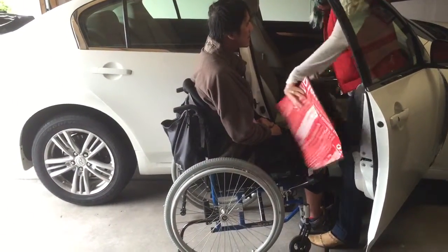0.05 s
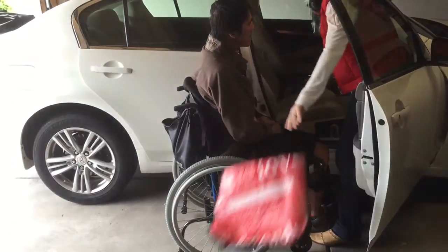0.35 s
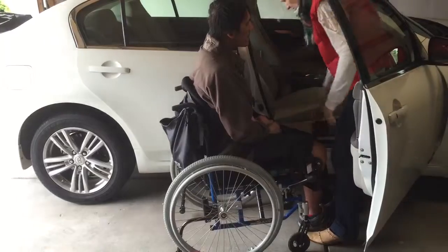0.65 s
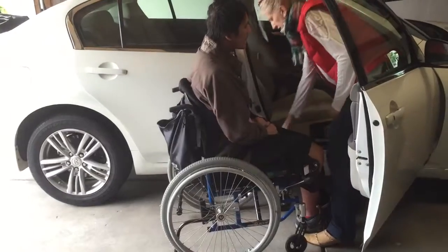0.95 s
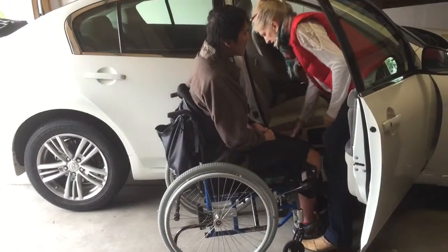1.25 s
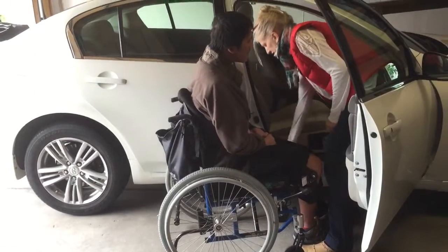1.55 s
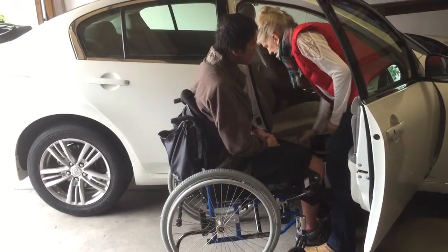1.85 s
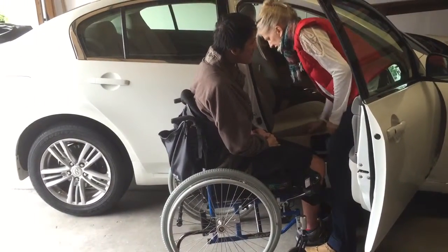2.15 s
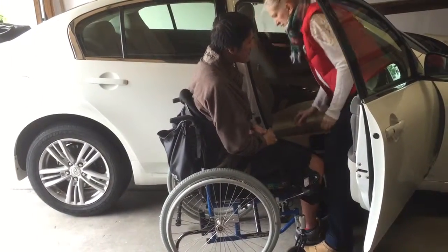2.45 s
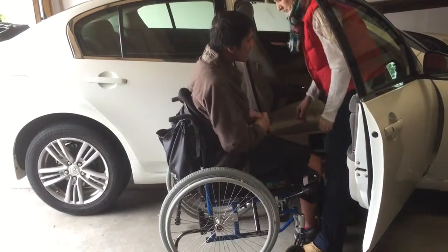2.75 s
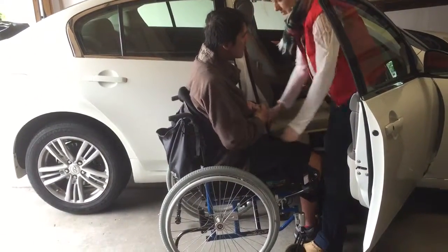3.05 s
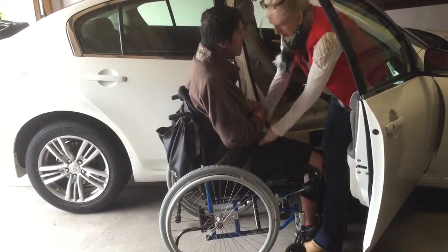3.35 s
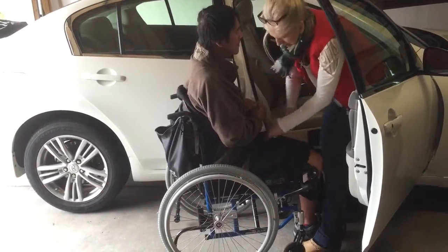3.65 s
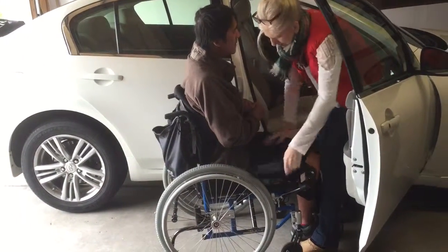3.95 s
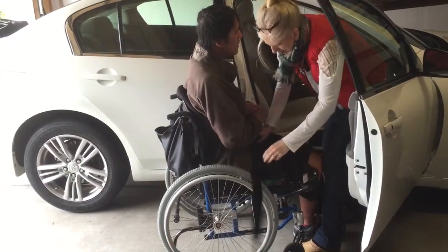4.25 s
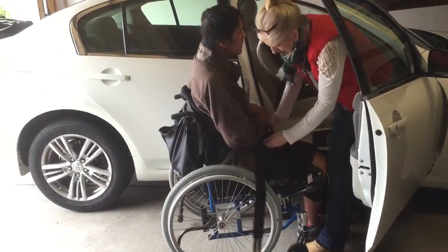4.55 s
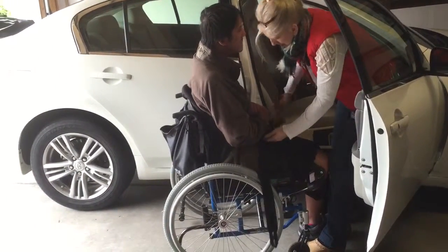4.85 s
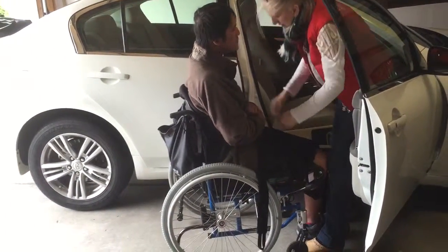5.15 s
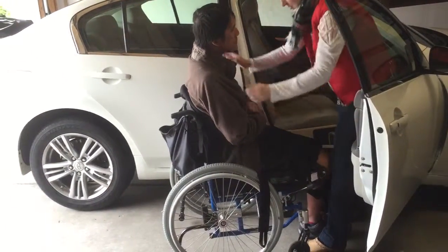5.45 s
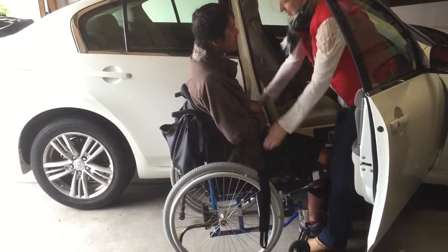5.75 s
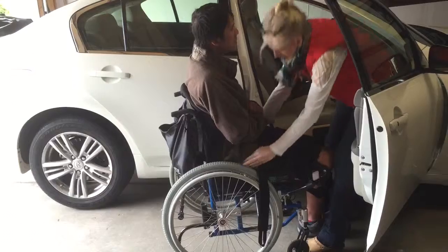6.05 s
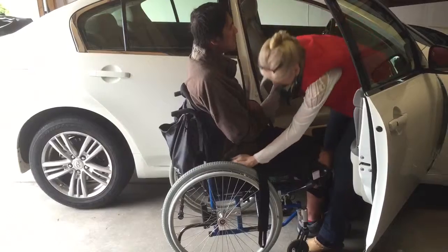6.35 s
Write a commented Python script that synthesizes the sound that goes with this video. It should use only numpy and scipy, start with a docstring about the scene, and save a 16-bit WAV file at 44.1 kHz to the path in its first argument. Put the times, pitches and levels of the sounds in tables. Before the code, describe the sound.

A thin plastic bag slaps and crumples a few times. A hollow car panel is knocked and rings briefly, then a metal catch snaps with a sharp ping, followed by light clacks and clicks from wheelchair fittings. A webbing strap swishes over an edge and creeps on in faint, stuttering zips while sleeves brush a jacket. It is heard from a few metres away in a quiet concrete garage with a short echo.

```python
"""Readying a wheelchair in a garage.

A helper works beside an open car, a few metres away. A tossed plastic bag slaps and crumples, a hollow
panel is knocked and rings, a metal catch pings and fittings click. Then a webbing strap swishes over
an edge and creeps on by stick and slip, and sleeves brush a jacket. Concrete and the car reflect it all."""
import sys
import numpy as np
from scipy import signal
from scipy.fft import rfft, irfft
from scipy.io import wavfile

SR = 44100
rng = np.random.default_rng(int(sys.argv[2]) if len(sys.argv) > 2 else 0)


def output_pcm(signal):
    """Save a mono or channel-first signal as 16-bit PCM at the path in sys.argv[1].

    Samples are clipped to [-1, 1] before scaling.
    """
    pcm = np.clip(np.atleast_2d(signal).T, -1, 1) * 32767
    wavfile.write(sys.argv[1], SR, np.round(pcm).astype(np.int16))


N = 286768
T = np.arange(N) / SR

# Spectrum of the hard fittings. Each row: frequency in Hz, level in dB.
FITTING_SPECTRUM = [(60, -32.5), (250, -14.5), (480, -5.5), (680, -0.5), (1000, 0), (1800, -1), (2500, -3),
                    (3800, -7.5), (6500, -11.5), (8500, -25), (15000, -30)]


def undb(db):
    """Decibels to gain."""
    return 10 ** (np.asarray(db) / 20)


def unit(x):
    """Scale to rms 1."""
    return x / np.sqrt(np.mean(x ** 2))


def fade(t, t60_s):
    """Exponential decay, 60 dB down at t60_s."""
    return np.exp(-np.log(1000) * t / t60_s)


def along(hz, points):
    """Interpolate (Hz, value) points on a log-frequency axis."""
    knots_hz, values = np.transpose(points)
    return np.interp(np.log(np.maximum(hz, 1)), np.log(knots_hz), values)


def add(out, start_s, x):
    """Mix x into out from start_s."""
    i = max(int(start_s * SR), 0)
    out[i:i + len(x)] += x[:N - i]


def butter(order, hz, kind="low"):
    """Butterworth filter sections."""
    return signal.butter(order, hz, kind, fs=SR, output="sos")


def colour(x, spectrum, bass_db=0, treble_db=0, bass_hz=520, treble_hz=3000, size=4096):
    """Minimum-phase filter of unit energy: a spectrum plus bass and treble shelves."""
    hz = np.arange(size // 2 + 1) * SR / size
    db = along(hz, spectrum) + bass_db / (1 + (hz / bass_hz) ** 4)
    db += treble_db * (1 - 1 / (1 + (hz / treble_hz) ** 4))
    cepstrum = irfft(np.log(undb(db)))
    cepstrum[1:size // 2] *= 2
    cepstrum[size // 2 + 1:] = 0
    impulse = irfft(np.exp(rfft(cepstrum)))
    return signal.fftconvolve(x, impulse / np.linalg.norm(impulse))[:len(x)]


def resonate(x, resonances):
    """Parallel resonances, each at least 20 Hz wide; rms 1."""
    return unit(sum(undb(db) * signal.lfilter(*signal.iirpeak(hz, hz / max(width_hz, 20), SR), x)
                    for hz, width_hz, db in resonances))


def walk(rate_hz):
    """Smooth random wander, spread near 1."""
    knots = rng.standard_normal(8192)
    return np.interp(T * rate_hz, np.arange(len(knots)), knots)


def grain(spread_db):
    """Friction noise: dense tiny slips of uneven size; rms 1."""
    noise = rng.standard_normal(N)
    sizes_db = spread_db * np.repeat(rng.standard_normal(N), 8)[:N]
    return unit(noise * undb(sizes_db))


def swell(start_s, rise_s):
    """Speed of one slip: peaks at 1 after rise_s, then dies away."""
    age = np.maximum(T - start_s, 0) / rise_s
    return age ** 2 * np.exp(2 * (1 - np.minimum(age, 20)))


def ring(start_s, modes, peak_db, contact_s=0.0013):
    """Decaying modes, built up over the contact."""
    t, out = T[:SR], np.zeros(N)
    tone = sum((-1) ** k * undb(db) * np.sin(2 * np.pi * hz * t) * fade(t, t60_s)
               for k, (hz, db, t60_s) in enumerate(modes))
    tone *= 1 - np.exp(-t / contact_s)
    add(out, start_s, undb(peak_db) * tone / np.abs(tone).max())
    return out


def blows(hits, spectrum, push, rise_s=0.0002):
    """Impacts: one push within a decaying chatter, coloured by the struck object."""
    t, out = T[:SR // 2], np.zeros(N)
    for start_s, db, bass_db, treble_db, t60_s in hits:
        force = rng.standard_normal(len(t)) * fade(t, t60_s) * (1 - np.exp(-t / rise_s))
        force[SR // 1000] += push
        add(out, start_s, undb(db) * colour(force, spectrum, bass_db, treble_db))
    return out


def air(level_db=-66.5, swell_db=1.8):
    """Outdoor air through the garage door, with a gently swelling rumble."""
    # Each row: frequency in Hz, level in dB.
    spectrum = [(15, -57.5), (25, -15), (39, -17), (61, 4.5), (91, -7), (119, 0.5), (147, -8.5),
                (239, -7.5), (468, -15), (1080, -14.5), (1450, -16), (3710, -21.5), (4480, -23.5),
                (5410, -24), (15400, -33)]
    steady = colour(rng.standard_normal(N), spectrum)
    rumble = signal.sosfilt(butter(2, 160), steady)
    return undb(level_db) * (steady + rumble * (undb(swell_db * walk(5.3)) - 1))


def garage(x, gap_s=0.0017, build_s=0.0066):
    """Reverb off concrete and the car: lumpy at first, then a smooth tail that loses its treble."""
    # Each row: band centre in Hz, t60 in seconds.
    bands = [(100, 0.98), (260, 0.45), (700, 0.52), (1840, 0.57), (4850, 0.43), (12800, 0.21)]
    t, hz = T[:SR], np.arange(SR // 2 + 1)
    noise = rng.standard_normal(SR)
    lumps_db = 5 * np.repeat(rng.standard_normal(SR), 40)[:SR] * fade(t, 0.7)
    spectrum = rfft(noise * undb(lumps_db))
    centres_hz, t60s_s = np.transpose(bands)
    tail = np.zeros(SR)
    for weights, t60_s in zip(np.eye(len(bands)), t60s_s):
        band_gain = along(hz, list(zip(centres_hz, weights)))
        tail += irfft(spectrum * band_gain, SR) * fade(t, t60_s)
    tail *= np.clip((t - gap_s) / build_s, 0, 1)
    return signal.fftconvolve(x, tail / np.linalg.norm(tail))[:N]


def nearby(x):
    """Early echoes off the floor and the car's side comb the spectrum."""
    # Each row: delay in seconds, level in dB.
    echoes = [(.0017, -30), (.0043, -23), (.0082, -19.5)]
    out = x.copy()
    for delay_s, db in echoes:
        add(out, delay_s, undb(db) * x)
    return out / np.sqrt(1 + sum(undb(db) ** 2 for _, db in echoes))


def squeaks(stutter_db=3.3):
    """Synthetic fabric squeaks faintly under the hands."""
    # Each row: start in seconds, level in dB, rise in seconds.
    slips = [(3.05, -72, 0.026), (3.185, -71, 0.023)]
    # Each row: frequency in Hz, width in Hz, gain in dB.
    resonances = [(4560, 450, 1), (6330, 550, -1.5), (7900, 570, -4)]
    tone = resonate(resonate(grain(1.6), resonances), resonances)
    tone *= undb(stutter_db * walk(89.6))
    return tone * sum(undb(db) * swell(start_s, rise_s) for start_s, db, rise_s in slips)


def sleeves(edge_s=0.0027, flutter_db=1.26):
    """Cloth brushes cloth in strokes that start and stop quickly; the stroke at 3.394 s is the strap's low
    scrape as the pull begins."""
    # Each row: start and length in seconds, then level, bass and treble in dB.
    strokes = [(.0, 0.15, -65, 2, 0), (2.542, 0.016, -59.5, 3, 27), (2.633, 0.03, -53, -10, 40),
               (3.394, 0.086, -62, 22, 15), (4.024, 0.041, -51, -14.5, 10), (4.189, 0.06, -60.5, 6, 18),
               (4.488, 0.23, -67, 4.5, 6), (4.754, 0.086, -58.5, 0, 15), (4.929, .42, -65, 5.5, 4.5),
               (5.732, 0.018, -53, -8, 1), (5.75, 0.058, -51.5, 7.5, 5), (5.895, 0.54, -72.5, 3.5, 4.5)]
    # Each row: frequency in Hz, level in dB.
    spectrum = [(100, -11), (350, -3), (600, 4), (1100, 5.5), (1700, 0.5), (3300, 3.5), (8500, -0.5),
                (10500, -6.5), (15000, -13)]
    friction = grain(1.4) * undb(flutter_db * walk(140))
    out = np.zeros(N)
    for start_s, length_s, db, bass_db, treble_db in strokes:
        attack = np.clip((T - start_s) / edge_s, 0, 1)
        release = np.clip((start_s + length_s - T) / edge_s + 1, 0, 1)
        rustle = colour(friction, spectrum, bass_db, treble_db, bass_hz=1290, treble_hz=6550)
        out += undb(db) * attack * release * rustle
    return out


def car_bumps():
    """Soft bumps against the car body."""
    # Each row: start in seconds, level, bass and treble in dB, t60 in seconds.
    hits = [(.002, -58, -2, 7, 1), (1.18, -57, 15, 2, 0.22), (1.245, -63, 23, -8, 0.13),
            (4.85, -58.5, -11, 0, 0.17), (6.075, -60, 2, 8.5, 0.046)]
    # Each row: frequency in Hz, level in dB.
    spectrum = [(35, -16.5), (60, 0.5), (130, -4.5), (260, 2.5), (430, -17.5), (2000, -35.5)]
    return blows(hits, spectrum, push=5)


def car_boom():
    """The car body booms softly as it is leaned on."""
    # Each row: frequency in Hz, relative level in dB, t60 in seconds.
    modes = [(55.2, -2, 0.34), (115.5, -2.5, 0.22)]
    return ring(4.845, modes, peak_db=-50.5, contact_s=0.017)


def tinkles():
    """Small metal parts on the bag ring."""
    # Each row: start in seconds, peak in dB.
    hits = [(.013, -57), (.164, -53.5), (.412, -59)]
    # Each row: frequency in Hz, relative level in dB, t60 in seconds.
    modes = [(8720, 0, .04), (9450, 1, .03), (11650, -3, 0.045)]
    return sum(ring(start_s, modes, peak_db) for start_s, peak_db in hits)


def buckle_scuffs():
    """A buckle slides briefly: friction with no blow."""
    # Each row: start in seconds, level and treble in dB, rise in seconds.
    slides = [(4.367, -50.5, 1.5, 0.012), (5.455, -49.5, 13.5, 0.0062)]
    friction = grain(2)
    return sum(undb(db) * swell(start_s, rise_s) * colour(friction, FITTING_SPECTRUM, 0, treble_db)
               for start_s, db, treble_db, rise_s in slides)


def fitting_clicks():
    """Hard fittings of the chair click."""
    # Each row: start in seconds, level, bass and treble in dB, t60 in seconds.
    hits = [(1.173, -51, 18, 9.5, 0.038), (2.4748, -39.5, 5.5, 0, 0.076), (2.524, -45.5, 1, -4, 0.095),
            (2.553, -46.5, 1, -2.5, 0.069)]
    return blows(hits, FITTING_SPECTRUM, push=1.07)


def loose_part():
    """A loose hollow part clacks as it rocks to rest."""
    # Each row: start in seconds, level, bass and treble in dB, t60 in seconds.
    hits = [(2.235, -41.5, -19, -0.5, 0.1), (2.286, -41, 4, -4, 0.086), (2.32, -49, 5, -9, 0.044),
            (2.397, -53, 14, -10, 0.1)]
    # Each row: frequency in Hz, level in dB.
    spectrum = [(60, -21), (420, -8.5), (530, 7), (780, 2.5), (1000, 0), (1200, -9), (1750, -7.5),
                (2100, -19), (6000, -21), (15000, -48)]
    return blows(hits, spectrum, push=5.9)


def dull_knocks():
    """Dull knocks: the loudest, at 2.635 s, is on a lever, with fainter raps after it."""
    # Each row: start in seconds, level, bass and treble in dB, t60 in seconds.
    hits = [(2.635, -30.5, -5.5, -8.5, 0.029), (2.69, -55, -1, -7, 0.027), (4.817, -48, -5, 11, 0.1)]
    # Each row: frequency in Hz, level in dB.
    spectrum = [(60, -15), (170, -5.5), (235, 4.5), (400, -0.5), (510, -2), (640, 0), (800, -0.5),
                (1300, -1), (1850, -3.5), (2200, -17), (2700, -32), (5000, -22), (15000, -35)]
    return blows(hits, spectrum, push=8.4)


def bag(slap_t60_s=0.021, crumple_delay_s=0.0017, crumple_rise_s=0.0029):
    """Thin plastic slaps down, then its creases give way in a dying crackle."""
    # Each row: start in seconds, slap level, bass and treble in dB,
    # crumple level and treble in dB, crumple t60 in seconds.
    landings = [(.075, -36.5, -10, 2.5, -47, 5, 0.11), (0.6726, -34, 6, 1, -43, -2.5, 0.15),
                (0.7342, -38, -11, -13.5, -61, -17, .1), (0.8262, -34.5, -10, -20, -42.5, 6, 0.21),
                (.893, -43, -20, 6, -64, 3, 0.076)]
    # Each row: frequency in Hz, level in dB.
    spectrum = [(60, -9.5), (150, 1), (330, 5.5), (750, 0), (1200, -4), (2300, -7.5), (6000, -13.5),
                (10000, -19), (15000, -32)]
    slaps = blows([(*row[:4], slap_t60_s) for row in landings], spectrum, push=3.7, rise_s=0.00038)
    creases, crumple = grain(4), np.zeros(N)
    for start_s, *_, db, treble_db, t60_s in landings:
        t = np.maximum(T - start_s - crumple_delay_s, 0)
        envelope = fade(t, t60_s) * (1 - np.exp(-t / crumple_rise_s))
        crumple += undb(db) * colour(creases * envelope, spectrum, bass_db=-4, treble_db=treble_db)
    return slaps + crumple


def strap_jerks(rise_s=0.004, hiss_db=-9.5, sag_db_per_s=20, scatter_db=0.8, jitter_s=0.0004):
    """Webbing sticks and slips in near-steady runs of thin, pitched zips; each run weakens as it goes."""
    # Each row: start, length and slip period in seconds, level in dB.
    runs = [(4.523, .1, 0.029, -58.5), (4.637, .097, 0.028, -56), (4.752, .048, 0.0187, -53.5),
            (4.8584, .032, 0.0177, -53), (4.9295, .01, .02, -53), (4.9706, .03, 0.0194, -52),
            (5.028, .07, 0.019, -52.5), (5.118, .05, 0.0193, -51), (5.197, .045, 0.0309, -51),
            (5.256, .045, .03, -55), (5.428, .01, .02, -59)]
    # Each row: frequency in Hz, width in Hz, gain in dB.
    resonances = [(790, 200, 4.5), (5600, 450, 0), (7120, 1300, 3), (8470, 1500, -0.5), (13050, 410, -1),
                  (14000, 490, -6.5)]
    # Each row: frequency in Hz, level in dB.
    hiss_spectrum = [(400, -16), (2000, 5), (4500, 2), (6000, -6), (9000, -16), (10500, -6), (14000, -8),
                     (15500, -19)]
    speed = np.zeros(N)
    for start_s, length_s, period_s, db in runs:
        for lag_s in np.arange(0, length_s, period_s):
            slip_db = db - sag_db_per_s * lag_s + rng.normal(0, scatter_db)
            slip_s = start_s + lag_s + rng.normal(0, jitter_s)
            speed += undb(slip_db) * swell(slip_s, rise_s)
    pitched = resonate(resonate(grain(2), resonances), resonances)  # twice, for deeper valleys
    hiss = undb(hiss_db) * colour(grain(2.2), hiss_spectrum)
    return speed * unit(pitched + hiss)


def pull_speed_db(grip_s=3.462, fastest_s=3.6916, brake_s=3.841, stop_s=3.95):
    """Strap speed relative to its peak: it grips, speeds up, eases, is braked and coasts to a stop."""
    rise_db_per_s, ease_db_per_s, coast_db_per_s, edge_db_per_s = 80, 19, 43, 606
    brake_db, brake_time_s = 13, 0.025
    before, after = (lambda s: np.maximum(s - T, 0)), (lambda s: np.maximum(T - s, 0))
    stroke = rise_db_per_s * before(fastest_s) + ease_db_per_s * after(fastest_s)
    braking = brake_db * np.minimum(after(brake_s) / brake_time_s, 1) + coast_db_per_s * after(brake_s)
    edges = edge_db_per_s * (before(grip_s) + after(stop_s))
    return -stroke - braking - edges


def strap_pull(hiss_db=-28, rub_db=-37.5, rub_exponent=0.57, resonance_db=-16, flutter_db=1.9):
    """Webbing rasps over an edge: a low rub, and a hiss that grows faster with speed."""
    # Each row: frequency in Hz, level in dB.
    spectrum = [(60, -18), (140, -9), (400, -7.5), (1000, -6), (2300, -2), (4300, -0.5), (7000, 0.5),
                (9300, 0), (10500, -4.5), (12500, -4.5), (15400, -12.5)]
    # Each row: frequency in Hz, width in Hz, gain in dB.
    resonances = [(158, 12, 5), (410, 28, 7), (896, 36, 9.5), (3500, 36, -6), (3805, 35, 12),
                  (4410, 180, 5), (5230, 40, 10), (6020, 35, 9), (6350, 45, -4), (7020, 33, 4),
                  (8800, 20, 0), (9300, 20, 5)]
    # The strap catches. Each row: centre in seconds, dip in dB, half length in seconds.
    snags = [(3.744, -5.5, 0.009), (3.812, -6, 0.023)]
    rasp = colour(grain(3.6), spectrum)
    rasp += undb(resonance_db) * resonate(rasp, resonances)
    low, high = (unit(signal.sosfilt(butter(3, 2300, kind), rasp)) for kind in ("low", "high"))
    speed_db = pull_speed_db()
    # A slow pull lacks the finest fizz and the deepest rumble.
    slowness = 1 - undb(0.47 * speed_db)
    fizz = signal.sosfiltfilt(butter(2, 7500, "high"), high)
    rumble = signal.sosfiltfilt(butter(2, 600), low)
    snag_db = sum(db * np.exp(-((T - centre_s) / half_s) ** 2) for centre_s, db, half_s in snags)
    hiss = (high - slowness * fizz) * undb(hiss_db + speed_db + snag_db)
    rub = (low - slowness * rumble) * undb(rub_db + rub_exponent * speed_db)
    return (hiss + rub) * undb(flutter_db * walk(170))


def catch_snap():
    """The metal catch snaps home."""
    # Each row: start in seconds, level, bass and treble in dB, t60 in seconds.
    hits = [(2.0683, -23.5, 0.5, 1.5, 0.026)]
    # Each row: frequency in Hz, level in dB.
    spectrum = [(100, -19.5), (450, -7), (1500, -6.5), (2900, -1), (4200, 0), (5200, -6.5), (6200, 0.5),
                (7200, -6), (8000, -11), (11800, -17), (12700, -9), (15000, -18.5)]
    return blows(hits, spectrum, push=0.88, rise_s=0.0006)


def catch_ping():
    """The catch rings in high, closely spaced modes."""
    # Each row: frequency in Hz, relative level in dB, t60 in seconds.
    modes = [(3454, 6.5, 0.054), (3460, -19, 0.54), (3494, -17, 0.36), (3390, -20, 0.36), (3080, -27, 0.14),
             (6207, -4.5, 0.022), (6500, -39.5, .2), (12580, -20.5, 0.06), (12620, -27, .12)]
    return ring(2.069, modes, peak_db=-15)


def panel_ring():
    """The hollow panel rings on after the knock."""
    # Each row: frequency in Hz, relative level in dB, t60 in seconds.
    modes = [(178, -5, .28), (200, -1.5, 0.14), (222.6, 1, 0.39), (257, -4.5, 0.65), (338, 0, 0.25),
             (368.5, -8.5, 0.65), (426, -9, 0.61), (568, -10.5, .45), (632, -11.5, 0.25),
             (823, -13.5, 0.45), (962, -19.5, 0.91), (1046, -17, 0.41), (1170, -11, .47),
             (1130, -19.5, .55), (1316, -17, 0.55), (1585, -20.5, .39), (1740, -22, 0.51), (1960, -19, .4),
             (2170, -22.5, .36)]
    return ring(1.7635, modes, peak_db=-18)


def panel_knock(rebound_db=-22, loss_db=5, bass_db=-3, dulling_db=3, gap_s=0.0075, t60_s=0.05):
    """The panel is touched, then struck; each rebound is later, weaker, duller and longer."""
    # Each row: start in seconds, level, bass and treble in dB, t60 in seconds.
    hits = [(1.7612, -23, -3.5, 3, 0.024), (1.7645, -17, 3, -5, 0.033)]
    # Each row: frequency in Hz, level in dB.
    spectrum = [(40, -34), (70, -26.5), (100, -12), (135, -7.5), (180, -3.5), (220, -0.5), (275, -2),
                (345, 1.5), (420, -6), (640, -6), (1180, -7.5), (1550, -13.5), (2200, -14), (3200, -24),
                (6000, -33), (15000, -54)]
    starts_s = hits[-1][0] + np.cumsum(gap_s * 2.3 ** np.arange(3))
    rebounds = [(start_s, rebound_db - i * loss_db, bass_db, -(i + 1) * dulling_db, t60_s * 1.8 ** i)
                for i, start_s in enumerate(starts_s)]
    return blows(hits, spectrum, push=9.5) + blows(rebounds, spectrum, push=1.5, rise_s=0.0015)


def scene():
    """Direct sound, garage reverb and outdoor air, in mono."""
    # Each row: sound, reverb send in dB.
    sources = [(nearby(bag()), -4), (tinkles(), -9),
               (panel_knock(), -6), (panel_ring(), -24),
               (catch_ping(), -16), (nearby(catch_snap()), -2),
               (nearby(fitting_clicks()), -5), (loose_part(), -5), (dull_knocks(), -6), (car_bumps(), -8),
               (nearby(strap_pull()), -10), (strap_jerks(), -11), (buckle_scuffs(), -12),
               (car_boom(), -20), (squeaks(), -10), (nearby(sleeves()), -8)]
    direct = sum(x for x, _ in sources)
    reverb = garage(sum(x * undb(send_db) for x, send_db in sources))
    return (direct + reverb + air())[None]


def record(dry):
    """Steep low-pass at 15.4 kHz."""
    return signal.sosfilt(signal.ellip(10, 0.2, 80, 15400, fs=SR, output="sos"), dry)


dry = scene()
out = record(dry)
output_pcm(out)
```